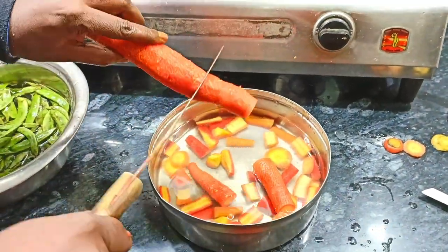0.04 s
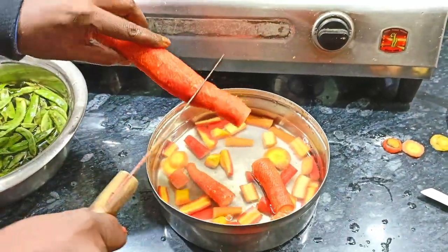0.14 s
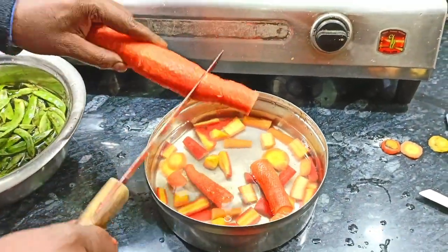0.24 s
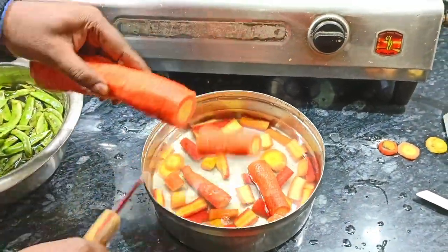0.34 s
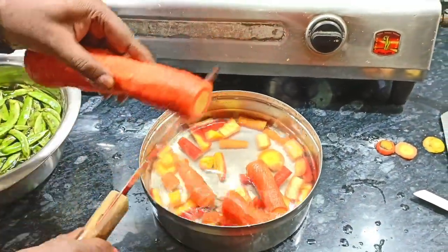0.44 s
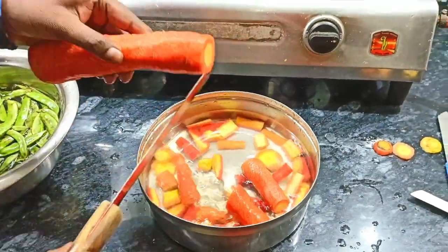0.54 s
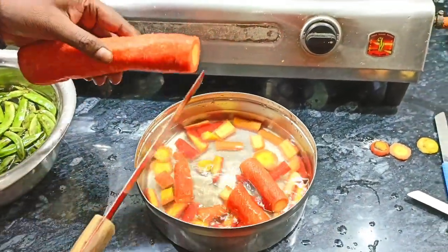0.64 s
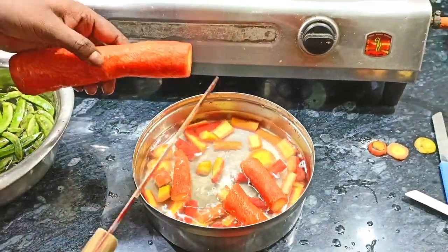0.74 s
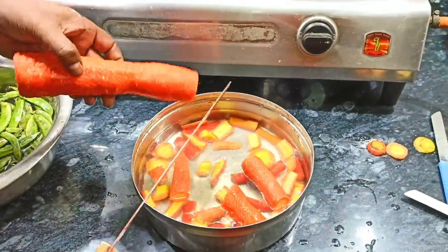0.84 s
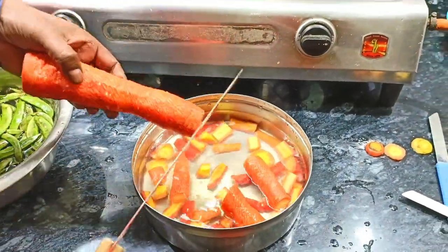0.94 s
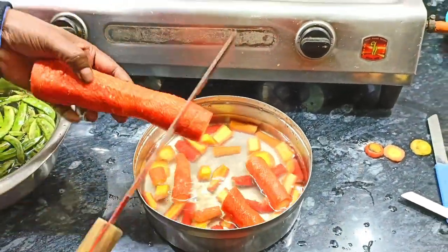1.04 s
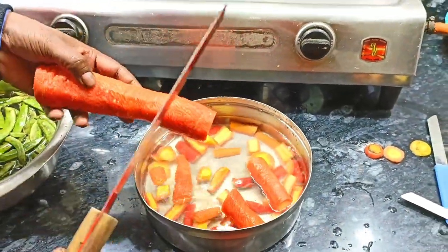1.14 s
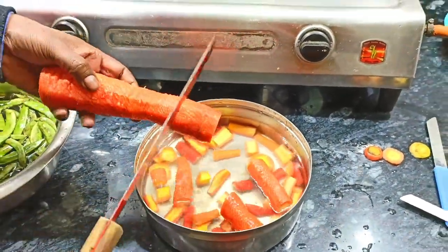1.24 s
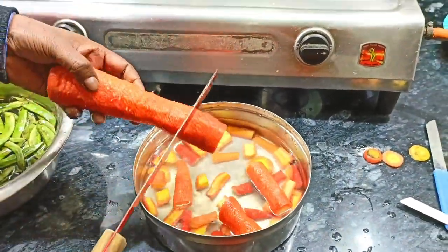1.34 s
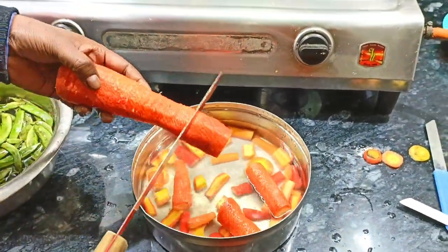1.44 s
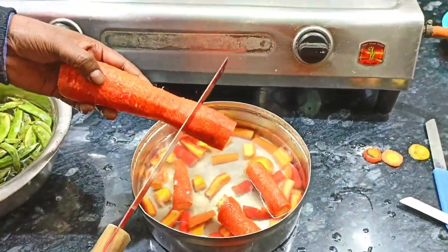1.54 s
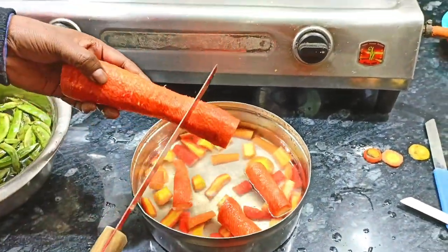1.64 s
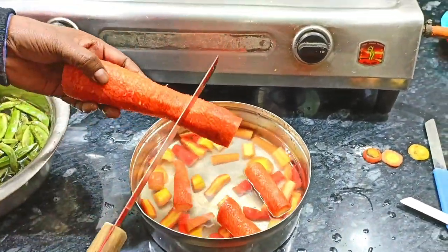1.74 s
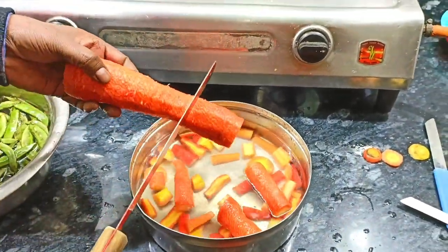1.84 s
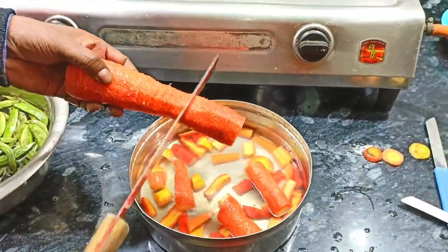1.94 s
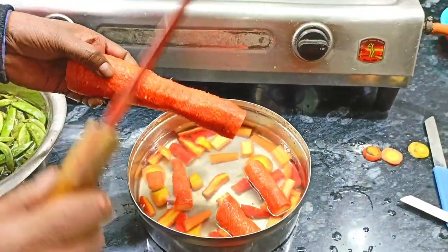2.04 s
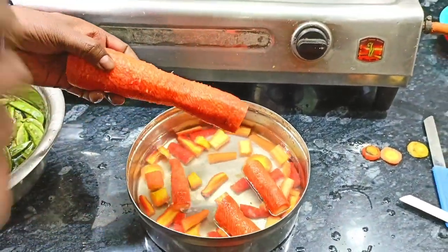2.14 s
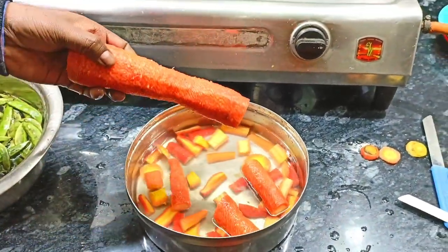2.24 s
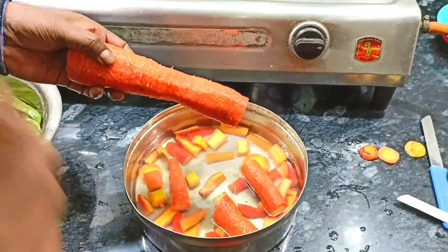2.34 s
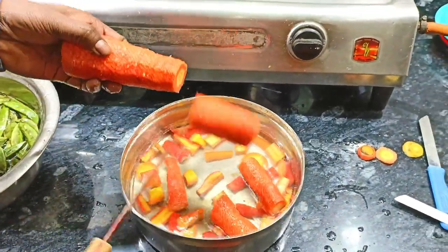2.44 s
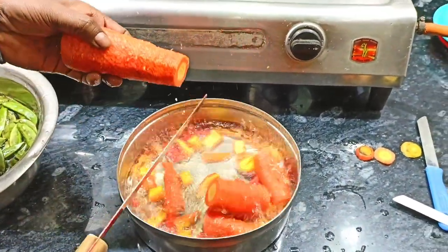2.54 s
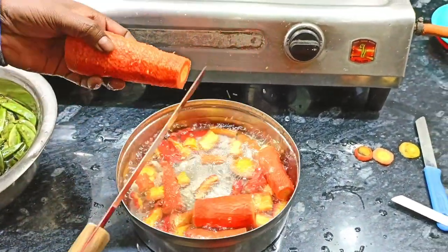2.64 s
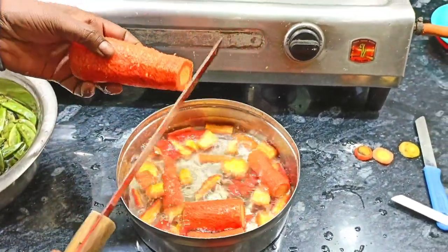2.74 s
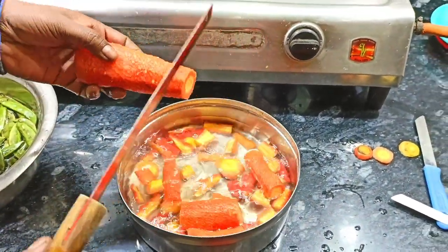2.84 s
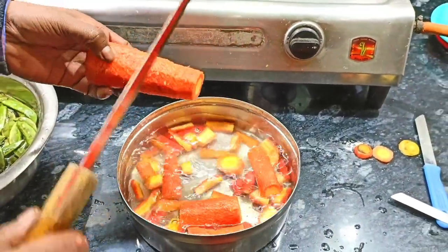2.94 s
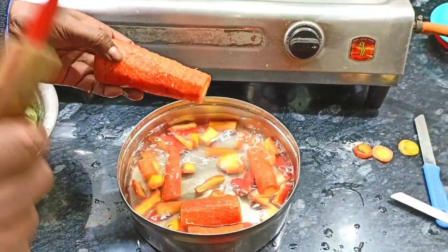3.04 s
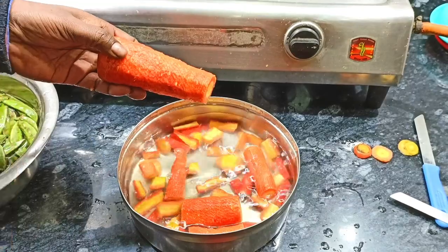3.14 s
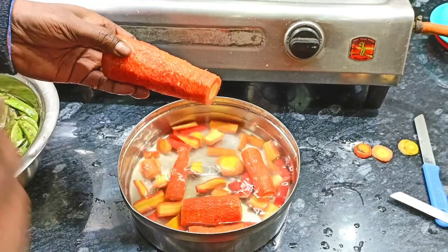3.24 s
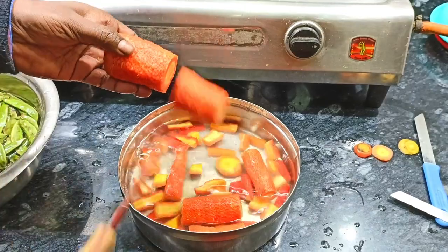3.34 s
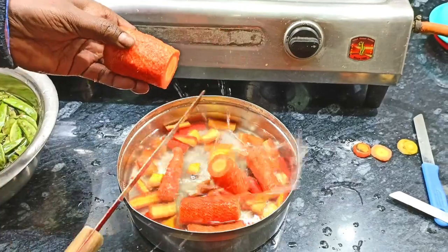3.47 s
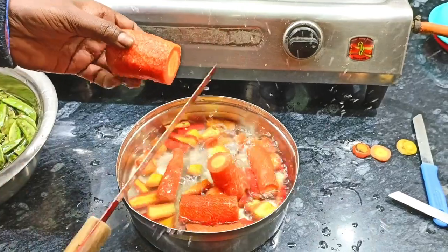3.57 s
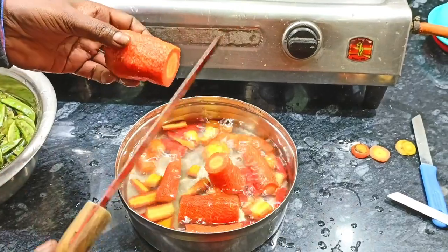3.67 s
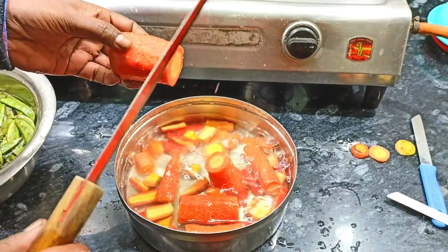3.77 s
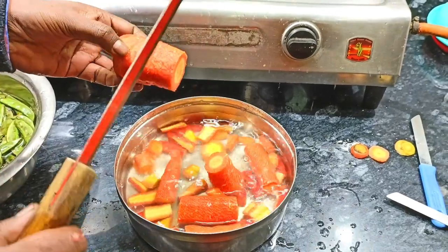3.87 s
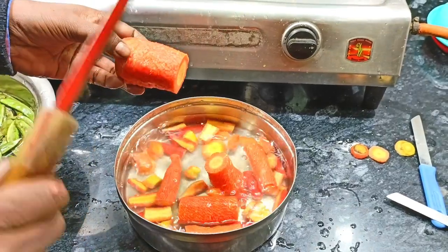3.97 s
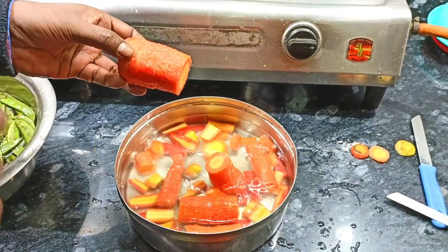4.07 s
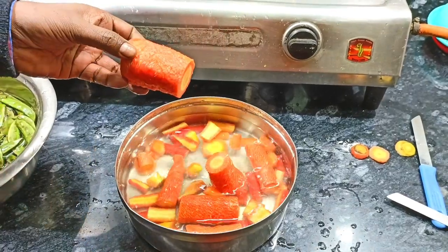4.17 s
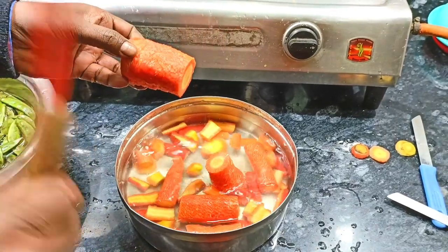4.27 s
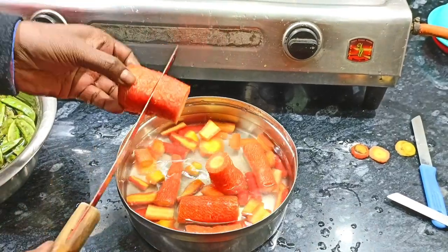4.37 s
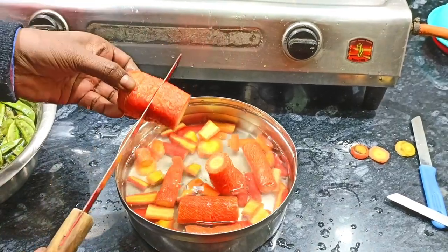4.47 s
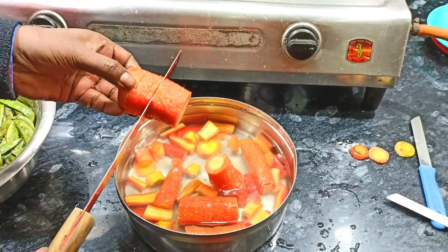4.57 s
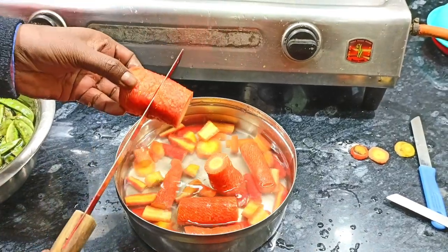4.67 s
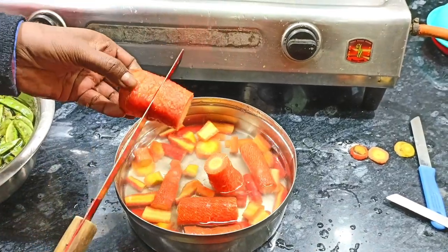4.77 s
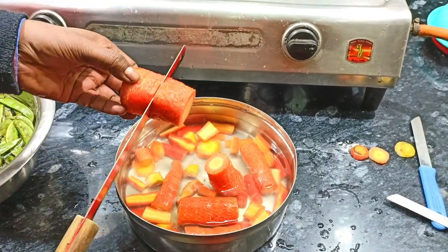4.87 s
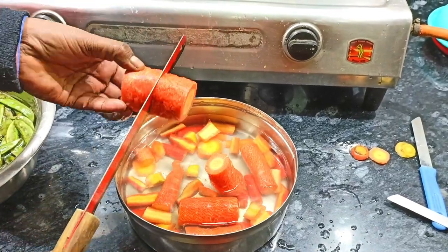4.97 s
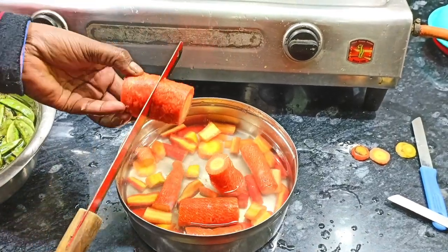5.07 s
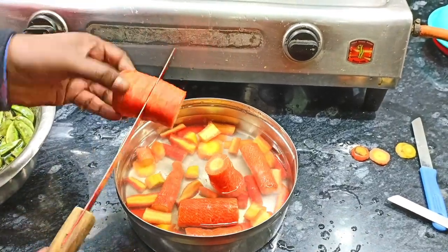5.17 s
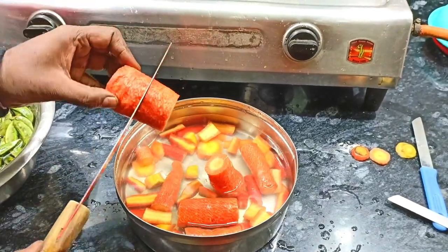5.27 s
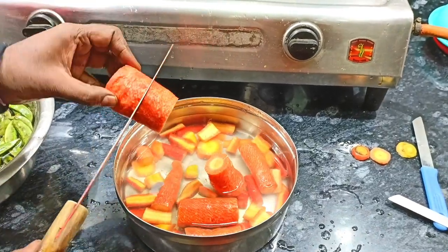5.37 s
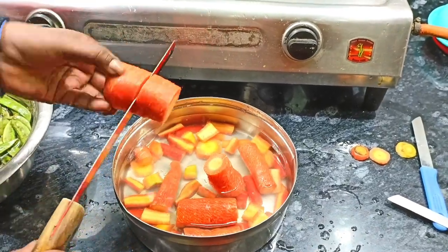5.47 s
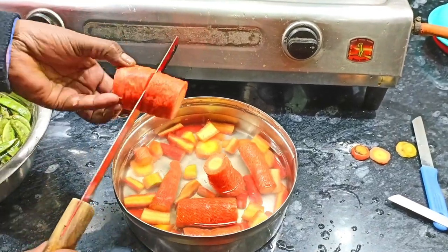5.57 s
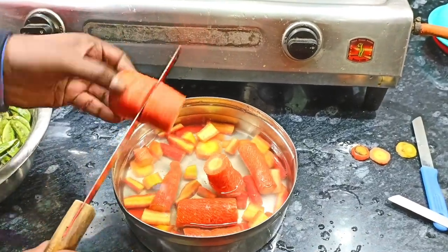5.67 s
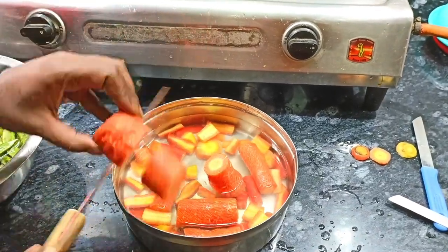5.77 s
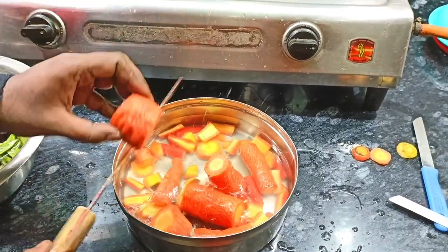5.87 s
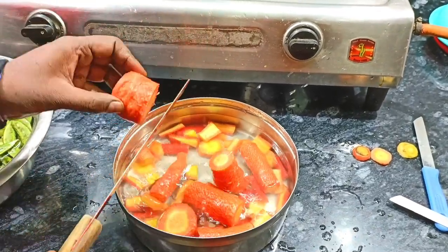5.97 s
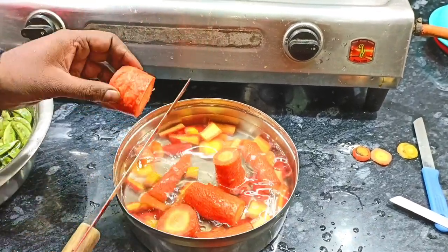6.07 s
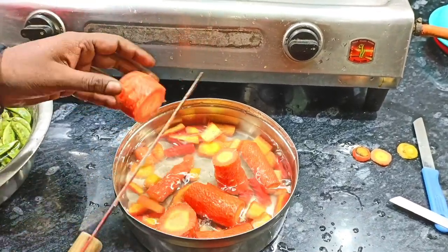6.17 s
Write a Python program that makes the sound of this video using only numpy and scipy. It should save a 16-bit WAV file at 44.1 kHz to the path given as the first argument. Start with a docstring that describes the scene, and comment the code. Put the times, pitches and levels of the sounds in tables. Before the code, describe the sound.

Crisp snaps of a carrot being cut, with chunks splashing into water and knocking a metal bowl into a soft ring.

```python
"""A knife chops chunks off a hand-held raw carrot over a steel bowl of water in a hard-walled kitchen.
The blade nicks and squeaks, the carrot splits in a run of cracks, and a first chunk plunges in with
a slap and bubbles, then knocks the bowl into ringing. Three chops follow, each a swish, a bite and a
split; the first two drop a chunk, the third is faint. The last piece is sawn through slowly, falls in
and throws up drops. Sleeve and blade brush along as the hands shift."""
import sys
import numpy as np
from scipy import signal
from scipy.fft import rfft, irfft
from scipy.io import wavfile

SR = 44100
rng = np.random.default_rng(int(sys.argv[2]) if len(sys.argv) > 2 else 0)


def inscribe(sig):
    """Save sig as 16-bit PCM at rate SR to the path in sys.argv[1].

    A 1-D sig is mono; a 2-D sig holds one channel per row.
    Samples are clipped to [-1, 1] before scaling.
    """
    pcm = np.round(np.clip(np.atleast_2d(sig).T, -1, 1) * 32767)
    wavfile.write(sys.argv[1], SR, pcm.astype(np.int16))


N = 274026
TIME = np.arange(N) / SR
SWING_LEAD_S = .032   # the blade is fastest this long before the bite

# knife chops: bite_s, bite_db, swish_db, top_pitch_hz, lift_db, lift_length_s, thud_db
CHOPS = [(2.337, -29, -45.5, 4350, -50, 0.35, -14), (3.259, -35.5, -50, 3697, -59, 0.29, -40),
         (4.2364, -37, -51, 3058, -55, 0.33, -21)]
# chunks hitting the water: start_s, slap_db, slap_low_hz, cavity_db, splash_db, pocket_db, length_s
PLUNGES = [(0.303, -27.5, 189, -21.5, -22, -19.5, 0.076), (2.366, -20, 130, -16, -22.5, -26, 0.099),
           (3.372, -21, 432, -21.5, -28.5, -30.5, .034), (5.758, -26, 330, -16.5, -22.5, -33, .028)]
# chunks knocking the bowl: start_s, thud_db, ring_db, strongest_pitch_hz
KNOCKS = [(.001, -43, -44.5, 117.4), (.435, -28, -24.5, 945), (2.52, -19.5, -29, 588),
          (3.42, -31, -37, 365), (5.858, -18, -35.5, 335)]


def carrot_cracks(first_force=.7, snap_fade_s=.0026):
    """A shower of tiny fractures sets the chunk ringing: a snap, then a tear that builds and dies."""
    # splits: start_s, snap_db, chunk_pitch_hz, ring_db, tear_db, tear_build_s, tear_fade_s
    splits = [(0.2901, -12.5, 4730, 5, -17, 0.058, 0.0075), (2.36, -10, 3870, 5.5, -20, 0.027, 0.05),
              (3.263, -19, 3580, -6, -44.5, 0.091, 0.057), (4.2403, -37, 3460, 23.5, -64, 0.028, 0.011)]
    # resonances of the carrot: pitch_hz, width_hz, level_db
    carrot_modes = [(755, 66, -5), (1895, 59, -1.5), (3000, 240, -1.5), (3760, 73, -5.5), (4320, 350, 2.5),
                    (5050, 390, 0.5)]
    # tone of a crack: frequency_hz, level_db
    crack_colour = [(50, -31.5), (200, -7.5), (600, -5.5), (950, 3.5), (1500, -2), (2300, -7), (3500, -5),
                    (5000, -6.5), (6500, -14.5), (9000, -23), (12000, -22), (16000, -31)]
    out, t = np.zeros(N), TIME[:12000]
    fractures, fibres = grains(per_s=9000, spread_db=2), grains(per_s=3500, spread_db=3)
    for s, snap_db, hz, ring_db, tear_db, build_s, fade_s in splits:
        snap = from_db(snap_db) * burst(fractures, s, snap_fade_s, rise_s=.000054)
        force = np.interp(t, [0, build_s], [first_force, 1])
        force *= np.exp(-np.maximum(t - build_s, 0) / fade_s)
        tear = from_db(tear_db) * shaped(fibres, s, force)
        add(out, s, snap + from_db(ring_db - 6) * resonance(snap, hz, width_hz=570))
        add(out, s, tear + from_db(-10) * resonance(tear, .75 * hz, width_hz=1700))
    return colour(from_db(-7) * out + from_db(-18.5) * modes(out, carrot_modes), crack_colour)


def blade_bites(bite_fade_s=.0056, firm_db=-41, db_per_octave=7):
    """The edge sinks in: a full crackle and a thud under a chop, a thin creak under light pressure."""
    # light nicks in the flesh: start_s, level_db
    nicks = [(.238, -40.5), (1.754, -54), (3.369, -42.5), (4.872, -51.5), (5.04, -55), (5.106, -51),
             (5.387, -50), (5.564, -46), (5.647, -37), (5.756, -43.5)]
    # tone of the edge going in: frequency_hz, level_db
    nick_colour = [(100, -5.5), (600, -9.5), (1100, 1), (1800, -5.5), (3200, -2.5), (4800, -1.5),
                   (6500, -7.5), (9000, -14.5), (11000, -4.5), (16000, -16.5)]
    out, thuds, fractures = np.zeros(N), np.zeros(N), grains(per_s=5400, spread_db=-.5)
    for s, db, *_, thud_db in CHOPS:
        bite = burst(fractures, s, bite_fade_s, rise_s=.0013)
        add(out, s, from_db(db) * cut(bite, 404, "high"))
        add(thuds, s, band_burst(fractures, s, thud_db, bite_fade_s, band_hz=(140, 430)))
    for s, db in nicks:
        top_hz = 11980 * 2 ** ((db - firm_db) / db_per_octave)   # lighter nicks are duller
        crackle = cut(burst(fractures, s, fade_s=.009, rise_s=.00083), 3150, "high")
        creak = from_db(-6) * resonance(crackle, 5070, width_hz=660)   # wet flesh sings on the blade
        add(out, s, from_db(db - 5) * (cut(crackle, top_hz, "low") + creak))
    return from_db(7.5) * colour(out, nick_colour) + thuds


def water_plunges():
    """A slap on the surface, the deeper churn of the cavity, its splash, and a thud against the bowl."""
    # tone of the churning water: frequency_hz, level_db
    plunge_colour = [(40, -37), (75, -20.5), (120, 6.5), (170, -6.5), (220, -0.5), (300, -3), (370, 0.5),
                     (450, -5.5), (780, -6.5), (1100, -5.5), (2000, 8.5), (5000, -9.5), (8000, -18.5)]
    churn, splash, eddies = np.zeros(N), np.zeros(N), froth()
    spray, deep_eddies = grains(per_s=6800, spread_db=3.5), np.roll(eddies, SR)
    for s, slap_db, low_hz, cavity_db, splash_db, _, length_s in PLUNGES:
        opens = cavity_opens(s, length_s)
        add(churn, s, band_burst(eddies, s, slap_db, length_s, (low_hz, 1060), rise_s=.004))
        add(churn, opens, band_burst(deep_eddies, opens, cavity_db, .91 * length_s, (79, 890)))
        add(splash, opens, band_burst(spray, opens, splash_db, .43 * length_s, (900, 4800), rise_s=.012))
    for s, thud_db, *_ in KNOCKS:
        add(churn, s, band_burst(eddies, s, thud_db, fade_s=.032, band_hz=(72, 276)))
    return from_db(1.84) * colour(churn, plunge_colour) + splash


def cavity_opens(start_s, length_s):
    """The time at which the cavity opens behind a sinking chunk."""
    return start_s + .74 * length_s


def froth(cycles=13):
    """Churning water: a crowd of ringing bubbles mixed with turbulence."""
    edges_hz, crowd = np.geomspace(90, 1200, 13), 0
    for low, high in zip(edges_hz, edges_hz[1:]):
        hz = rng.uniform(low, high)
        ringing = resonance(grains(per_s=70, spread_db=2.5), hz, hz / cycles)
        crowd += np.sqrt(2 * (high - low) / SR) * ringing
    return np.sqrt(.5) * (crowd + rng.standard_normal(N))


def bubbles_and_drops(ring_cycles=17, drop_fade_s=.0028, drop_span=1.37):
    """Each cavity traps an air pocket, single bubbles ring, and thrown drops tick on the surface."""
    # the largest bubbles: start_s, level_db, pitch_hz
    bubbles = [(.293, -22, 864), (2.441, -13, 852), (2.468, -8.5, 778), (3.383, -19.5, 700),
               (3.481, -26.5, 2020), (3.49, -20, 3230)]
    # drops falling back: start_s, level_db, pitch_hz
    drops = [(3.5, -31, 6100), (5.817, -16, 3000), (5.831, -21.5, 3670), (5.864, -35, 2630)]
    out, spatter = np.zeros(N), rng.standard_normal(N)
    for s, *_, pocket_db, length_s in PLUNGES:
        add(out, cavity_opens(s, length_s), bubble(pocket_db, hz=785, t60_s=.06))
    for s, db, hz in bubbles:
        add(out, s, bubble(db, hz, ring_cycles / hz))
    for s, db, hz in drops:
        tick = band_burst(spatter, s, db, drop_fade_s, (hz / drop_span, hz * drop_span), rise_s=.0006)
        contact_click = from_db(db - 31) * burst(spatter, s, drop_fade_s, rise_s=.00057)
        add(out, s, tick + contact_click)
    return from_db(3) * out


def bubble(db, hz, t60_s, climb=.33):
    """A damped sine whose pitch climbs as the bubble nears the surface."""
    t = TIME[:8000]
    pitch_hz = hz * (1 + climb * np.minimum(t / t60_s, 1))
    return from_db(db - 60 * t / t60_s) * (1 - np.exp(-t * hz)) * np.sin(phase_of(pitch_hz))


def bowl_ring(rise_s=.0042, db_per_octave=33, max_loss_db=15):
    """Every knock rings all modes of the bowl; where it lands decides which ring most."""
    # modes of the bowl of water on the counter: pitch_hz, level_db, t60_s
    bowl_modes = [(118.4, -0.5, 0.8), (133, -2, 1), (199.5, -4.5, 0.11), (235, -5, 0.64), (347, -3.5, 0.6),
                  (359, 1, 0.71), (546.5, -2.5, .75), (581, -6, 0.59), (773, 1, 0.53), (859, -11.5, 0.7),
                  (1030, -1.5, 0.38), (1248, -8.5, 0.9)]
    out, t = np.zeros(N), TIME[:SR]
    attack = 1 - np.exp(-t / rise_s)
    for s, _, ring_db, strongest_hz in KNOCKS:
        for hz, db, t60_s in bowl_modes:
            loss_db = min(db_per_octave * abs(np.log2(hz / strongest_hz)), max_loss_db)
            decay = from_db(ring_db + db - loss_db - 60 * t / t60_s)
            add(out, s, attack * decay * np.sin(2 * np.pi * hz * t))
    return out


def blade_swishes(rise_s=.088, fall_s=.042):
    """Narrow bands of hiss whose pitch and level follow the speed of the blade."""
    # resonances of the swish: pitch_ratio, level_db
    swish_bands = [(.52, -8.5), (.76, -2.5), (1, 4), (1.33, -9.5)]
    pitch_hz, gain = np.zeros(N), np.zeros(N)
    for bite_s, _, db, top_hz, *_ in CHOPS:
        s = bite_s - SWING_LEAD_S
        speed, moving = hand_move(s, rise_s, fall_s)
        pitch_hz += top_hz * (.5 + .5 * speed) * moving
        gain += from_db(db) * speed ** 2
    phase, hiss = phase_of(pitch_hz), 0
    for ratio, db in swish_bands:
        eddies = cut(rng.standard_normal((2, N)), 120, "low")
        band = eddies[0] * np.sin(ratio * phase) + eddies[1] * np.cos(ratio * phase)
        hiss += from_db(db) * rms_one(band)
    return gain * hiss


def blade_squeaks(jitter=.0071):
    """Stick and slip swell into a wavering tone until the carrot gives way."""
    # the wet blade in the cut: start_s, end_s, level_db, pitch_hz
    squeaks = [(0.265, 0.289, -35, 5457), (2.337, 2.347, -40.5, 4040)]
    out, waver = np.zeros(N), rms_one(cut(rng.standard_normal(N), 390, "low"))
    for start_s, end_s, db, hz in squeaks:
        swell = np.interp(TIME, [start_s, end_s, end_s + .002], [0, 1, 0])
        out += from_db(db) * swell * np.sin(phase_of(hz * (1 + jitter * waver)))
    return out


def sawing():
    """Slow, gritty strokes of the blade through the last piece."""
    # saw strokes: fastest_s, length_s, level_db
    strokes = [(4.73, 0.2, -60), (4.89, 0.19, -63), (5.12, 0.2, -51), (5.42, 0.25, -57), (5.66, 0.39, -53)]
    # tone of the sawing: frequency_hz, level_db
    saw_colour = [(300, -7.5), (1200, -7), (3200, -6), (4300, 0.5), (5400, -4), (7200, -7.5), (9000, -12.5),
                  (11100, -6), (16000, -13.5)]
    return friction(even_strokes(strokes), saw_colour, grains(per_s=1600, spread_db=1.5),
                    blade_db=-5.5, brighten=.91, steepness=1.44, flutter_db=.5)


def brushing(lift_rest_s=.12, arm_rise_s=.11, arm_fall_s=.19):
    """Sleeve and blade brush along as the hands shift, and as the arm lifts and comes down to chop."""
    # shifts of the hands: fastest_s, length_s, level_db
    shifts = [(.01, 0.15, -53.5), (.185, 0.19, -52), (.7, 0.51, -61), (1.18, 0.21, -62.5),
              (1.54, 0.13, -68.5), (3.66, 0.36, -69), (6.09, 0.34, -50.5)]
    # tone of the brushing: frequency_hz, level_db
    brush_colour = [(100, -10), (450, -9.5), (800, -6), (1400, -4), (2500, -7), (3700, 0), (5200, -3.5),
                    (7000, -15.5), (8700, -18), (11000, -11.5), (16000, -22)]
    strokes = even_strokes(shifts)
    for bite_s, _, swish_db, _, lift_db, lift_s, _ in CHOPS:
        strokes += even_strokes([(bite_s - lift_rest_s - lift_s / 2, lift_s, lift_db)])
        strokes.append((bite_s - SWING_LEAD_S, arm_rise_s, arm_fall_s, swish_db + .6))
    return friction(strokes, brush_colour, grains(per_s=3800, spread_db=.5),
                    blade_db=-14, brighten=.5, steepness=.81, flutter_db=0)


def friction(strokes, spectrum, grit, blade_db, brighten, steepness, flutter_db, full_treble_db=-51.5):
    """Fine grit under each stroke excites the blade; a brisker stroke is louder and has more treble."""
    # modes of the steel blade: pitch_hz, width_hz, level_db
    blade_modes = [(1400, 29, -5), (2329, 34, 2), (3730, 24, -9), (4500, 120, -8), (5005, 180, -1),
                   (5780, 90, 3), (8200, 89, -9.5), (12100, 53, -6)]
    rub, gain = np.zeros(N), np.zeros(N)
    catch_and_slip = from_db(flutter_db * rms_one(cut(rng.standard_normal(N), 45, "low")))
    for s, rise_s, fall_s, db in strokes:
        speed, moving = hand_move(s, rise_s, fall_s)
        level = from_db(db) * speed[moving] ** steepness
        # the carrot grips the blade at a new place each time, which shifts its modes
        gripped = [(hz * (1 + .04 * rng.normal()), width_hz, mode_db + 3 * rng.normal())
                   for hz, width_hz, mode_db in blade_modes]
        scrape = grit[moving] + from_db(blade_db) * modes(grit[moving], gripped)
        rub[moving] += level * catch_and_slip[moving] * rms_one(colour(scrape, spectrum))
        gain[moving] += level
    dull = signal.sosfiltfilt(signal.butter(3, 6500, fs=SR, output="sos"), rub)
    treble_share = np.clip(gain / from_db(full_treble_db), 1e-6, 1) ** brighten
    return dull + treble_share * (rub - dull)


def near_surfaces(x):
    """Short echoes comb the spectrum and make the cutting sound hollow."""
    # first reflections off counter, stove front and wall: delay_s, level_db
    echoes = [(.0014, -23.5), (.0033, -24.5), (.0052, -13.5)]
    echoed = x + sum(from_db(db) * np.pad(x, (round(delay_s * SR), 0))[:N] for delay_s, db in echoes)
    return echoed / np.sqrt(1 + sum(from_db(db) ** 2 for _, db in echoes))


def kitchen_reverb(x, build_up_s=.0051):
    """Dense reflections from tiles and counter, dying band by band."""
    # decay of the kitchen: frequency_hz, t60_s
    decay_times = [(100, 0.8), (300, 0.41), (1000, 0.38), (4000, 0.4), (7000, 0.31), (14000, 0.32)]
    t, edges_hz, tail = TIME[:SR], np.geomspace(50, 18000, 11), 0
    for low, high in zip(edges_hz, edges_hz[1:]):
        decay = from_db(-60 * t / at_hz(decay_times, np.sqrt(low * high)))
        band = cut(rng.standard_normal(SR), [low, high], "band") * decay
        tail += rms_one(band * (1 - np.exp(-t / build_up_s))) * np.sqrt(2 * (high - low)) / SR
    return signal.oaconvolve(x, tail)[:N]


def room_tone():
    """A faint, steady rumble with a trace of hiss."""
    # tone of the background: frequency_hz, level_db
    floor_colour = [(15, -48), (25, -5.5), (43, -6.5), (161, -2), (451, -12.5), (575, -12.5), (734, -15),
                    (818, -17.5), (2280, -24), (3820, -26.5), (7510, -41), (13600, -31.5), (16000, -38.5)]
    return from_db(-68) * colour(rng.standard_normal(N), floor_colour)


def hand_move(s, rise_s, fall_s):
    """The speed of a hand, 0 to 1 to 0 with its peak at s, and a mask of when it moves."""
    speed = np.sin(np.interp(TIME, [s - rise_s, s, s + fall_s], [0, np.pi / 2, np.pi]))
    return speed, (TIME > s - rise_s) & (TIME < s + fall_s)


def even_strokes(rows):
    """Strokes that slow down as they speed up: fastest_s, rise_s, fall_s, level_db."""
    return [(s, length_s / 2, length_s / 2, db) for s, length_s, db in rows]


def grains(per_s, spread_db):
    """Random clicks of uneven force, as of bursting cell walls; rms 1."""
    sizes = from_db(spread_db * np.minimum(rng.exponential(1, N), 4))
    return rms_one(sizes * rng.choice([-1, 1], N) * (rng.random(N) < per_s / SR))


def burst(source, s, fade_s, rise_s):
    """A stretch of the source that swells and dies away."""
    t = TIME[:12000]
    return shaped(source, s, np.exp(-t / fade_s) * (1 - np.exp(-(t / rise_s) ** 2)))


def band_burst(source, s, db, fade_s, band_hz, rise_s=.0011):
    """A burst confined to a band."""
    return from_db(db) * cut(burst(source, s, fade_s, rise_s), band_hz, "band", order=4)


def shaped(source, s, envelope):
    """A stretch of the source under an envelope, with the envelope's energy."""
    at = round(s * SR)
    piece = source[at:at + len(envelope)] * envelope
    return piece * np.sqrt(np.sum(envelope ** 2) / (np.sum(piece ** 2) + 1e-12))


def resonance(x, hz, width_hz):
    """One resonance; white noise keeps its power."""
    r = np.exp(-np.pi * width_hz / SR)
    feedback = [1, -2 * r * np.cos(2 * np.pi * hz / SR), r * r]
    return signal.lfilter(np.sqrt((1 - r * r) / 2) * np.array([1, 0, -1]), feedback, x + 1e-18)


def modes(x, table):
    """Parallel resonances; white noise keeps its power."""
    ringing = sum(from_db(db) * resonance(x, hz, width_hz) for hz, width_hz, db in table)
    return ringing / np.linalg.norm(from_db([db for *_, db in table]))


def colour(x, spectrum, size=4096):
    """Minimum-phase EQ with the given spectrum; white noise keeps its power."""
    gain = rms_one(from_db(at_hz(spectrum, np.arange(size // 2 + 1) * SR / size)))
    cepstrum = irfft(np.log(gain))
    cepstrum[1:size // 2] *= 2
    cepstrum[size // 2 + 1:] = 0
    return signal.oaconvolve(x, irfft(np.exp(rfft(cepstrum))))[:len(x)]


def cut(x, hz, kind, order=2):
    """Butterworth filter; kind names the part that passes."""
    sections = signal.butter(order, np.clip(hz, 10, .45 * SR), kind, fs=SR, output="sos")
    return signal.sosfilt(sections, x + 1e-18)


def at_hz(points, hz):
    """Read a table on a log-frequency axis."""
    points = np.array(points)
    return np.interp(np.log(np.maximum(hz, 1)), np.log(points[:, 0]), points[:, 1])


def phase_of(hz):
    """Running phase of a gliding pitch."""
    return 2 * np.pi * np.cumsum(hz) / SR


def from_db(db):
    """Decibels to gain."""
    return 10 ** (np.asarray(db) / 20)


def rms_one(x):
    """Scale to rms 1."""
    return x / np.sqrt(np.mean(x ** 2) + 1e-20)


def add(track, s, sound):
    """Mix a sound in at a time."""
    at = round(s * SR)
    track[at:at + len(sound)] += sound[:N - at]


def scene():
    """Knife, carrot and water up close, with the kitchen ringing behind them."""
    cracks, bites = near_surfaces(carrot_cracks()), blade_bites()
    bubbles = bubbles_and_drops()
    blade = blade_swishes() + blade_squeaks()
    plunges = water_plunges()
    rubbing = near_surfaces(brushing() + sawing())
    close = cracks + bites + bubbles + blade + plunges + bowl_ring() + rubbing
    reverb_send = (from_db(-3) * (cracks + bites) + from_db(.5) * plunges
                   + from_db(-4) * bubbles + from_db(-14.5) * blade)
    return (close + kitchen_reverb(reverb_send) + room_tone())[None]


def record(dry):
    """The microphone sheds the deep bass; the top is cut steeply."""
    top_cut = signal.ellip(10, .2, 80, 15900, fs=SR, output="sos")
    return signal.sosfilt(top_cut, cut(dry, 45, "high"))


dry = scene()
out = record(dry)
inscribe(out)
```